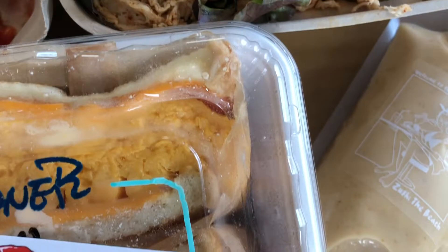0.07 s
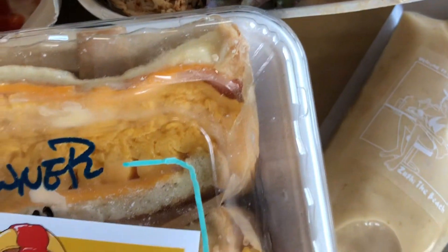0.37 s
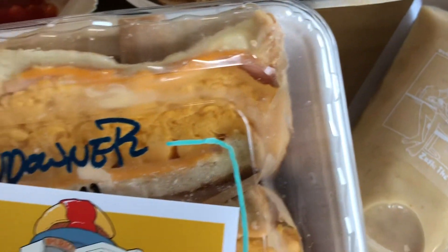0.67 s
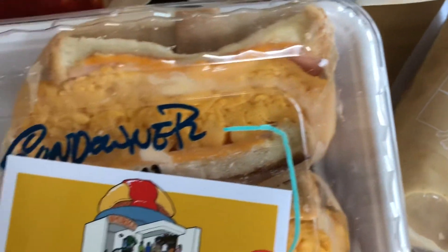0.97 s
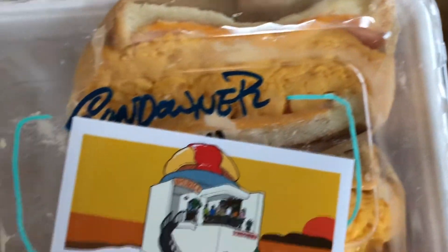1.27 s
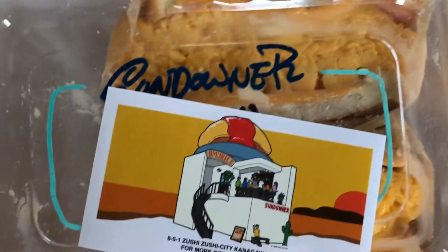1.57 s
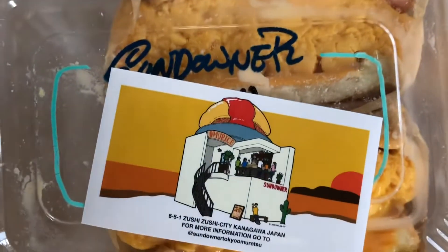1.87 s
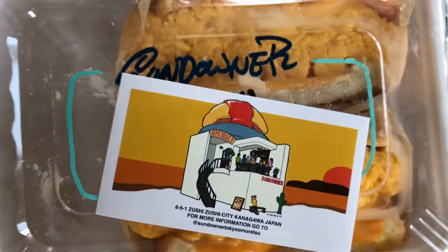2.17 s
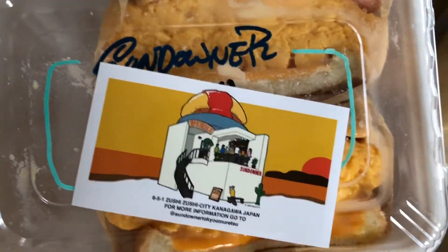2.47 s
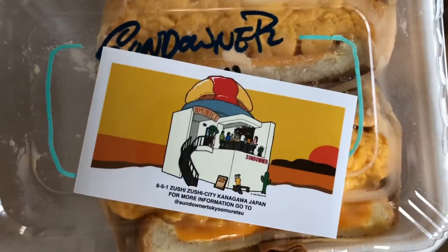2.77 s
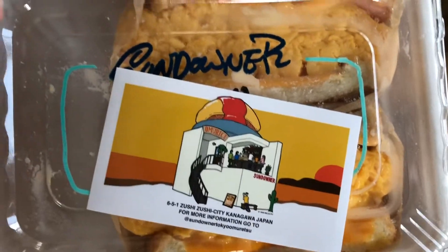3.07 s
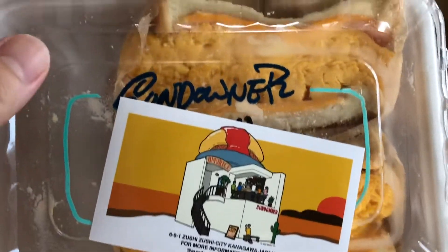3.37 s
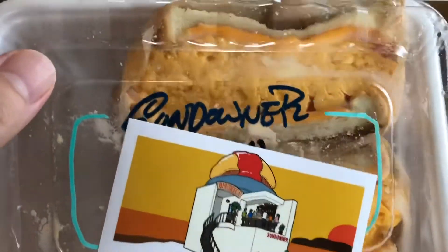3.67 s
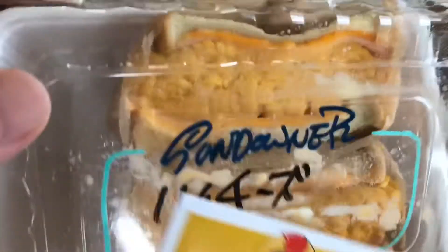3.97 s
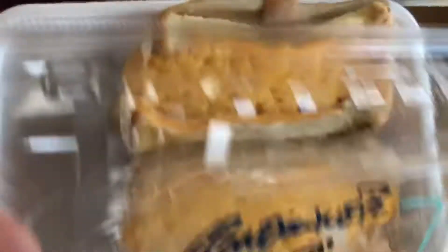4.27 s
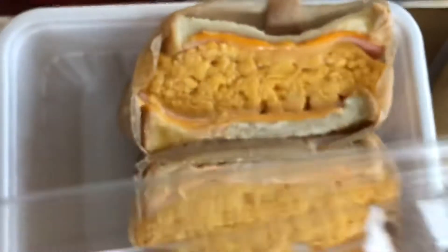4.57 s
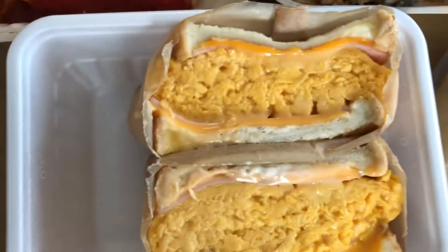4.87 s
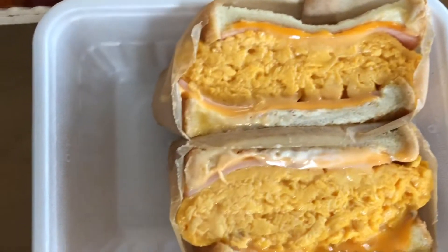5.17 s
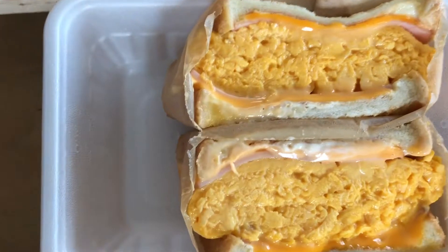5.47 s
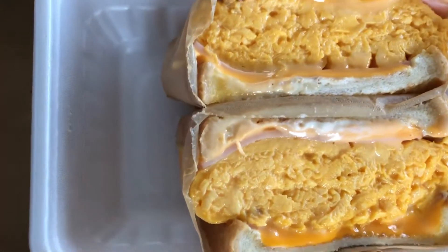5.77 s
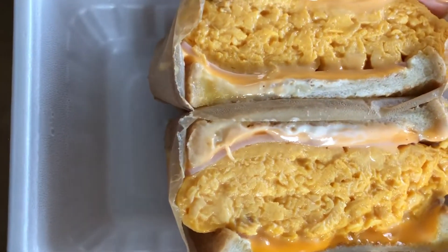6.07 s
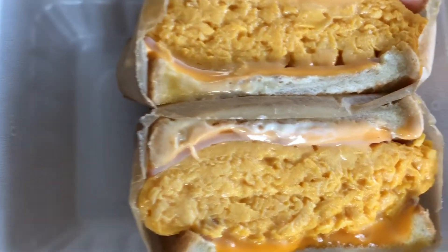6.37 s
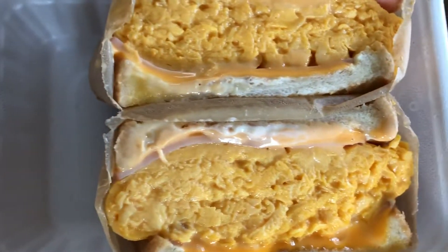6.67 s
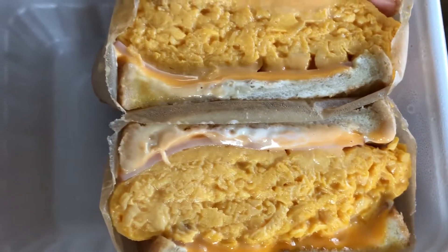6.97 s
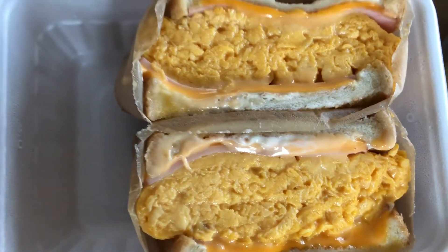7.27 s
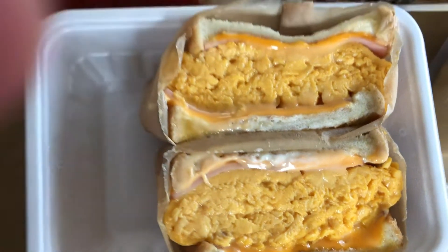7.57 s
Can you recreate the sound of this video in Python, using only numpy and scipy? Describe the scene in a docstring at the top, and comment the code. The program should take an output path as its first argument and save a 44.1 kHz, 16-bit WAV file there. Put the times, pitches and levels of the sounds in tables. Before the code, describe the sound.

Ventilation hums in a small, quiet room while hands brush faintly near the microphone. Fingers slide along the rim of a plastic takeaway tray, then the thin lid comes free with one loud pop and crackles, rustles and wobbles as it is lifted. Afterwards the tray gives a few scattered ticks, with a brief fingertip squeak and a soft knock.

```python
"""Ventilation drones in a small, quiet room, and hands brush softly close to the microphone.
Fingers slide along the rim of a takeaway tray, hissing as they stick and slip. Its thin plastic lid
buckles free with one loud pop, then crackles, rustles and wobbles as it bends and is lifted away.
Last, with a little more room around it, the tray ticks as it is turned and its walls give,
while fingertips squeak and knock on it."""
import sys
import numpy as np
from scipy import signal
from scipy.fft import rfft, irfft, next_fast_len
from scipy.io import wavfile
from scipy.ndimage import uniform_filter1d

SR = 44100
rng = np.random.default_rng(int(sys.argv[2]) if len(sys.argv) > 2 else 0)


def wav_record(signal):
    """Record a signal, one row per channel, as 16-bit PCM in the file named by sys.argv[1]."""
    frames = np.transpose(np.atleast_2d(signal))
    bounded = np.clip(frames, -1, 1)
    # unit amplitude maps onto the largest positive 16-bit level
    quanta = np.round(bounded * 32767).astype(np.int16)
    wavfile.write(sys.argv[1], SR, quanta)


N = 336483

# Room air. Each row: frequency in Hz, relative spectral level in dB.
AIR_COLOUR = [(15, -47), (25, -21.5), (45, -13), (70, -11), (98, -2.5), (135, -4.5), (175, -3.5),
              (215, -12), (265, -3.5), (350, -12), (520, -17.5), (1100, -21.5), (1800, -23), (2700, -25),
              (5200, -28.5), (7200, -28), (11000, -36.5), (15500, -38)]
# Duct resonances. Each row: frequency in Hz, width in Hz, level in dB.
DUCT_RESONANCES = [(263.76, 21, -73.5), (600, 100, -75.5), (1724, 250, -80), (3523, 120, -83)]
# The distant fan. Each row: pitch in Hz, level in dB, ratio of wavering to steady tone.
FAN_TONES = [(100.9, -71, 1.5), (170.43, -63, 0.38)]
# Background whistles. Each row: start, peak and end in seconds, pitch in Hz, level in dB.
WHISTLES = [(0.3, 0.5, 0.94, 3640, -81.5), (0.51, 0.539, 0.626, 1414, -64.5), (0.698, 0.95, 1.1, 3426, -76),
            (1.225, 1.265, 1.374, 1400, -69.5)]
# How long the room rings. Each row: frequency in Hz, t60 in seconds.
ROOM_DECAY = [(150, .5), (500, .34), (900, .36), (4000, .45), (8000, .24), (16000, .15)]
# Colours of the room's ring and the friction sounds. Each row: frequency in Hz, relative level in dB.
ROOM_COLOUR = [(100, 6), (300, 0), (600, -3), (1500, -3), (4000, -8.5), (6000, -6.5), (8000, -1.5),
               (12500, -6.5), (16000, -9)]
BRUSH_COLOUR = [(150, -25.5), (400, -1.5), (680, 2), (1000, -2.5), (1350, -6), (1800, -14), (3000, -35.5),
                (16000, -51)]
SLIDE_COLOUR = [(100, -19.5), (280, -0.5), (700, 1), (1900, 0.5), (2500, -4.5), (3400, -4.5), (3850, 3.5),
                (4200, -2), (4700, -0.5), (5400, -5.5), (9500, -8), (12000, -9.5), (16000, -11)]
RUSTLE_COLOUR = [(100, -25), (250, -10), (650, -4), (1100, -4.5), (1400, -7.5), (1800, -2), (2200, -7),
                 (4300, -9.5), (7000, -13.5), (11000, -16.5), (16000, -28.5)]

# Hands brushing and fingers squeaking. Each row: start, peak and end in seconds, level in dB.
BRUSHES = [(0.01, 0.099, 0.277, -61), (0.182, 0.258, 0.377, -63.5), (1.169, 1.305, 1.485, -63.5),
           (2.571, 2.676, 2.79, -63)]
SQUEAKS = [(6.421, 6.44, 6.453, -54), (6.471, 6.475, 6.488, -53), (6.494, 6.503, 6.512, -53)]
# Resonances of a squeak. Each row: frequency in Hz, width in Hz, relative level in dB.
SQUEAK_RESONANCES = [(1948, 70, -3.5), (3700, 142, 1), (4580, 630, -8), (5980, 220, -2)]
# Slides over plastic. Each row: start, peak and end in seconds, level in dB, tilt in dB per octave.
SLIDES = [(2.837, 2.858, 2.99, -45, 2), (2.92, 2.98, 3.03, -48, -1.07), (3.06, 3.075, 3.115, -58, -1.5),
          (3.2, 3.22, 3.27, -57, -2), (3.378, 3.427, 3.448, -43, -1.5), (3.553, 3.606, 3.635, -46.5, 1),
          (3.996, 4.013, 4.03, -40, -1.35), (4.035, 4.03, 4.11, -43, -3.5), (4.32, 4.35, 4.36, -48, -1.5),
          (4.466, 4.492, 4.525, -55, -2), (6.422, 6.437, 6.45, -57.5, 0), (5.88, 6.15, 6.33, -67.5, -1.5),
          (7.2, 7.45, 7.62, -63, -1.5)]
# Fingertip bumps. Each row: start in seconds, level in dB, pitch in Hz.
BUMPS = [(2.1303, -37, 197.6), (2.959, -48, 430), (3.468, -41, 250), (3.858, -35, 55), (4.372, -40.5, 235),
         (6.513, -29.5, 401)]

# Bands in which the plastic radiates, bass to top. Each row: lower and upper edge in Hz.
BANDS = [(155, 450), (450, 850), (850, 2000), (2000, 5500), (5500, 10500), (10500, 15500)]
# How well each shell radiates: one gain in dB for each band.
LID_VOICE_DB = [-0.5, -6.5, -0.65, 0, 0.13, -4]
TRAY_VOICE_DB = [-1.5, -7, -4, 2.5, -3.5, -5.5]
# The crowd of close, short-lived modes of a thin sheet. Each row: frequency in Hz, t60 in seconds.
SHEET_DECAY = [(200, 0.092), (600, 0.15), (1200, 0.09), (3500, 0.064), (8000, 0.018), (16000, 0.014)]
# Modes of the shells. Each row: frequency in Hz, relative level in dB, t60 in seconds.
LID_MODES = [(209.7, -11.5, 0.12), (230, -4, 0.07), (393, -10, 0.07), (520, -5, 0.05), (590, -9, 0.04),
             (662, -0.5, 0.045), (815, 0.5, 0.04), (914.1, 3.5, 0.041), (1106, 6, 0.026), (1200, 0, 0.04),
             (1310, -5.5, 0.04), (1460, -7, 0.06), (1670, 2, 0.045), (1778.6, 0, 0.075),
             (1931.6, -3, 0.05003), (2327, -2, 0.035), (2626, -5, 0.027), (2918.6, -1, 0.04),
             (3474, -8, 0.03), (3880, -7.5, .04), (4167, -3, 0.045), (4447, -9, .05), (4690, -7.5, 0.06),
             (4926, -4.5, 0.036), (6324, -7.5, 0.045), (7150, -5.5, .025), (8000, -5, 0.03067),
             (8900, -3, 0.019)]
TRAY_MODES = [(232, -5, 0.053), (285.8, -10.5, 0.103), (400, -6.5, 0.0574), (512.2, -3, 0.0457),
              (660, -2.5, 0.082), (791.4, 0.5, 0.0445), (907.4, -5.5, 0.07), (1295, -7, 0.0227),
              (1654, -2, 0.03), (1956.6, -3.5, 0.0484), (2294, -5, 0.022), (2810, -11.5, 0.035)]
TRAY_DAMPED_MODES = [(3600, 8, .005), (4150, 5, .005), (6100, 7, .004), (12550, 13, .003), (13800, 9, .002)]  # high modes that merge into broad humps
# A flat tray wall. Each row: multiple of its pitch, relative level in dB, t60 in seconds.
WALL_OVERTONES = [(1, -1, 0.17), (1.43, -9, .07), (2.07, -4, 0.08), (3.15, -7, .07)]
# Buckles of the tray. Each row: start in seconds, base level in dB, patch pitch in Hz, tilt above it in
# dB per octave, ring length as a factor, wall pitch in Hz, wall level in dB, top-band sparkle in dB.
TRAY_TICKS = [(4.7919, -49.5, 1800, -1, 0.89, 1153, -70, -5.5),
              (5.0906, -45.5, 250, 0.64, 1.11, 1121, -53.5, 0),
              (5.1079, -50, 329, -0.58, 0.87, 880, -61, 1),
              (5.444, -39.5, 297, -0.7963, 0.655, 840.5, -40.5, 8),
              (5.466, -41, 890, -5.5, 0.99, 850, -53.5, 11.5), (5.496, -50, 900, -7.5, 1.25, 852, -52.5, 0),
              (5.67, -33, 600, -2, 1.027, 976.7, -45.5, -4), (6.472, -47, 447, -2.5, 0.9, 598, -52, -1),
              (6.481, -64, 500, 1.5, 1.05, 619, -65.5, 2.5), (6.498, -61.5, 1700, 5, 1.94, 600, -61, 3),
              (6.512, -35.5, 400, -3.5, 1.29, 596.2, -37.5, 5), (6.526, -39, 600, -4, 1.45, 896, -54, 4),
              (6.538, -47, 600, -2.5, 1.1, 577, -55.5, 0), (7.419, -59.5, 1200, -1.5, 1.01, 853, -76.5, -5)]
# The lid is gripped, peeled and lifted. Each row: peak time, rise and fall time constants in seconds,
# rustle level in dB, wobble level in dB, wobble pitch in Hz.
LID_FLEXES = [(3.19, 0.2, 0.17, -57.5, -68.5, 200), (3.435, 0.0196, 0.017, -63.5, -48.5, 224),
              (3.6, 0.068, 0.0664, -46, -58, 199.2), (3.856, 0.0489, 0.03, -39, -39.5, 120),
              (3.965, 0.0175, 0.034, -39.5, -36, 187.9), (4.252, 0.037, 0.0662, -49.5, -47, 230),
              (4.367, 0.1, 0.0076, -44.5, -45, 232), (4.496, 0.0187, 0.039, -62, -62.5, 230)]
# Buckles of the lid. Each row: start in seconds, base level in dB, patch pitch in Hz,
# tilt above it in dB per octave, ring length as a factor.
LID_SNAPS = [(2.129, -62.5, 300, -0.5, 0.9), (3.123, -57.5, 400, -0.84, 0.76), (3.1909, -45, 650, -8, 0.6),
             (3.281, -45.5, 790, -15, 0.7), (3.344, -44, 985, -7.5, 0.55), (3.362, -46, 654, -7, 1.1),
             (3.429, -38.5, 520, -3.5, 0.6), (3.5327, -10, 660, -5.5, 0.656), (3.743, -45, 800, -2.5, 0.71),
             (3.757, -44, 1200, -2, 1.71), (3.8035, -41.5, 1710, -2, 1.7), (3.818, -38, 450, -3, 1.33),
             (3.829, -42.5, 1800, -5.5, 0.62), (3.8428, -34, 600, -1.5, 0.85),
             (3.85, -30, 400, -3.5, 0.744), (3.873, -37, 650, -3.5, 1.13), (3.898, -49, 900, -3.5, 0.71),
             (3.945, -38, 1000, -2.5, 0.7), (3.9466, -20, 1050, -4.5, 0.824),
             (3.958, -40.5, 900, -1.5, 0.68), (3.984, -35.5, 700, -3, 1.52),
             (4.022, -33.5, 1900, 1.5, 0.93), (4.044, -39, 740, -4.5, 0.364),
             (4.078, -39.5, 600, -4.5, 1.7), (4.0917, -46, 900, -4, 1.58),
             (4.2305, -46.5, 1200, -7.5, 0.616), (4.261, -52, 1200, -11.5, 0.72),
             (4.298, -32.5, 450, -5.5, 0.412), (4.3237, -39.5, 1190, -4, 0.8),
             (4.347, -44.5, 1200, -4, 0.84), (4.365, -37, 400, -4.5, 0.667)]


def gain_of(db):
    """Decibels to gain."""
    return 10 ** (np.asarray(db) / 20)


def unit_rms(x):
    """Scales to rms 1."""
    return x / np.sqrt(np.mean(x ** 2) + 1e-20)


def decay(t, t60):
    """An envelope that falls 60 dB in t60 seconds."""
    return np.exp(-np.log(1000) * t / t60)


def value_at(points, hz):
    """Reads a spectrum table on a log-frequency axis."""
    point_hz, value = np.transpose(points)
    return np.interp(np.log(hz + 1), np.log(point_hz + 1), value)


def add(mix, start, sound):
    """Mixes a sound in at a start time in seconds."""
    part = mix[round(start * SR):][:len(sound)]
    part += sound[:len(part)]


def coloured(x, colour, tilt_db=0):
    """Gives x a spectrum, tilted by some dB per octave; rms 1."""
    size = next_fast_len(len(x))
    hz = np.fft.rfftfreq(size, 1 / SR)
    gain = gain_of(value_at(colour, hz) + tilt_db * np.log2(hz + 1))
    return unit_rms(irfft(rfft(x, size) * gain, size)[:len(x)])


def resonate(x, hz, width_hz):
    """A resonance that can follow a moving frequency."""
    turn = np.exp(2j * np.pi * np.cumsum(hz * np.ones(len(x))) / SR)
    pole = np.exp(-np.pi * width_hz / SR)
    return 2 * (turn * signal.lfilter([1 - pole], [1, -pole], x / turn)).real


def narrow_noise(hz, width_hz, skirt_hz):
    """Noise through two resonances at one pitch; the wider one steepens the skirts."""
    return resonate(resonate(rng.standard_normal(N), hz, width_hz), hz, skirt_hz)


def dying_noise(seconds, t60_table, stretch=1):
    """Noise in which every frequency dies at its own speed."""
    noise = rng.choice([-1., 1.], int(seconds * SR))
    hz, t, spectrum = signal.stft(noise, SR, nperseg=128)
    t60 = stretch * value_at(t60_table, hz)[:, None]
    return signal.istft(spectrum * gain_of(-60 * t / t60), SR)[1]


def stroke(start, peak, end):
    """An envelope that rises straight to its peak and falls straight back."""
    return np.interp(np.arange(start, end, 1 / SR), [start, peak, end], [0, 1, 0])


def slips(samples, per_s, spread_db):
    """Stick and slip: a random train of tiny impulses, a few larger than the rest."""
    size = gain_of(spread_db * np.minimum(rng.exponential(1, samples), 4))
    return size * rng.choice([-1, 1], samples) * (rng.random(samples) < per_s / SR)


def bounced(x, strength, echoes=4):
    """Sound bounces between lid and tray walls within 5 ms, which ripples its spectrum."""
    taps = np.zeros(SR // 200)
    taps[0] = 1
    taps[rng.integers(SR // 1200, len(taps), echoes)] = strength * rng.choice([-1, 1], echoes)
    return np.convolve(x, taps)[:len(x)]


def ventilation(air_db=-59.5, swell_db=0.3):
    """Room tone: gently swelling air, a few duct resonances and the wavering tones of a distant fan."""
    swell = unit_rms(resonate(rng.standard_normal(N), hz=1.5, width_hz=1.7))
    out = gain_of(air_db + swell_db * swell) * coloured(rng.standard_normal(N), AIR_COLOUR)
    for hz, width_hz, db in DUCT_RESONANCES:
        out += gain_of(db) * unit_rms(narrow_noise(hz, width_hz, 2 * width_hz))
    for hz, db, waver_ratio in FAN_TONES:
        steady = unit_rms(np.sin(2 * np.pi * hz * np.arange(N) / SR))
        waver = unit_rms(narrow_noise(hz, width_hz=4.7, skirt_hz=40))
        out += gain_of(db) * unit_rms(steady + waver_ratio * waver)
    return out


def whistles():
    """Thin, slightly unsteady tones come and go faintly in the background."""
    out = np.zeros(N)
    for start, peak, end, hz, db in WHISTLES:
        envelope = stroke(start, peak, end)
        waver = unit_rms(uniform_filter1d(rng.standard_normal(len(envelope)), size=400))
        tone = np.sin(2 * np.pi * np.cumsum(hz * (1 + 0.004 * waver)) / SR)
        add(out, start, gain_of(db) * envelope * unit_rms(tone))
    return out


def room(x, delay_s=0.0036, build_s=0.00612):
    """The small room's diffuse ring; three tails crossfade, as its pattern shifts with the moving box."""
    out = np.zeros(N)
    for third in range(3):
        tail = coloured(dying_noise(0.6, ROOM_DECAY), ROOM_COLOUR)
        tail *= np.clip((np.arange(len(tail)) / SR - delay_s) / build_s, 0, 1)
        share = np.sqrt(2 / 3) * np.cos(np.pi * (1.7 * np.arange(N) / SR + third / 3))
        out += signal.oaconvolve(share * x, tail / np.linalg.norm(tail))[:N]
    return out


def brushes():
    """Skin and sleeve brush near the microphone as the hands shift: a soft, dull swish."""
    out = np.zeros(N)
    for start, peak, end, db in BRUSHES:
        pressure = stroke(start, peak, end) ** 0.636
        friction = slips(len(pressure), per_s=4000, spread_db=2)
        add(out, start, gain_of(db) * pressure * coloured(friction, BRUSH_COLOUR))
    return out


def squeaks(glide=0.021):
    """Skin sticks and slips on the tray; a few high resonances sing and rise with finger pressure."""
    out = np.zeros(N)
    for start, peak, end, db in SQUEAKS:
        pressure = stroke(start, peak, end) ** 0.39
        friction = slips(len(pressure), per_s=5300, spread_db=2)
        retune = 1 + glide * (pressure - 1)
        ring = sum(gain_of(part_db) * resonate(friction, hz * retune, width_hz)
                   for hz, width_hz, part_db in SQUEAK_RESONANCES)
        add(out, start, gain_of(db) * pressure * unit_rms(ring))
    return out


def slides():
    """Finger and rim slide over plastic: dense slips merge into a hiss that swells and fades."""
    out = np.zeros(N)
    for start, peak, end, db, tilt_db in SLIDES:
        pressure = stroke(start, peak, end) ** 0.92
        friction = bounced(slips(len(pressure), per_s=20000, spread_db=2.2), strength=0.22)
        add(out, start, gain_of(db) * pressure * coloured(friction, SLIDE_COLOUR, tilt_db))
    return out


def bumps(rise_s=0.002):
    """A soft fingertip wakes only the box's two lowest bending modes, and damps them at once."""
    out = np.zeros(N)
    t = np.arange(SR // 8) / SR
    envelope = (1 - np.exp(-t / rise_s)) * decay(t, t60=0.038)
    for start, db, hz in BUMPS:
        phase = 2 * np.pi * hz * t
        add(out, start, gain_of(db) * envelope * (np.sin(phase) + gain_of(-2.5) * np.sin(2 * phase)))
    return out


def patch_levels(db, hz, tilt_db, voice_db, bass_loss_db_per_octave=14.5):
    """Band levels of one buckle: a patch radiates poorly below its own pitch and tilts above it."""
    band_centres = np.sqrt(np.prod(BANDS, axis=1))
    octaves = np.log2(band_centres / hz)
    return db + np.array(voice_db) + octaves * np.where(octaves < 0, bass_loss_db_per_octave, tilt_db)


def buckle(band_db, ring_factor, modes, sheet_db, kick_db, kick_hz, rise_s):
    """A patch of plastic flips: one quick kick, then the shell's modes and the sheet's short hiss."""
    sheet = bounced(dying_noise(0.2, SHEET_DECAY, ring_factor), strength=0.25)
    t = np.arange(len(sheet)) / SR
    hz, db, t60 = np.transpose(modes)[:, :, None]
    tension, spot = rng.random((2, len(modes), 1))  # the bend retunes modes, the spot sets their phase
    hz = hz * (1 + 0.02 * (tension - 0.5))
    ringing = (gain_of(db) * decay(t, t60 * ring_factor) * np.sin(2 * np.pi * (hz * t + spot))).sum(0)
    cycles = t * kick_hz
    kick = cycles ** 2 * np.exp(2 - 2 * cycles) * np.sin(2 * np.pi * cycles)
    shell = ringing + gain_of(sheet_db) * sheet + gain_of(kick_db) * kick / ring_factor ** 2
    shell *= 1 - np.exp(-t / (rise_s * ring_factor ** 3))  # a larger patch rings longer and flips slower
    out = np.zeros(len(t))
    attack = t < 0.012
    for edges, level_db in zip(BANDS, band_db):
        band = signal.sosfilt(signal.butter(3, edges, "bandpass", fs=SR, output="sos"), shell)
        if edges == BANDS[0]:  # slow bending waves bring the bass late
            band *= 1 - np.exp(-t / 0.0038)
        out += gain_of(level_db) * band / np.sqrt(np.mean(band[attack] ** 2))
    return out


def wall_ring(hz, db, sharp_share=0.0505, settle_s=0.0145, rise_s=0.00076):
    """A dented wall of the tray rings hollow, starting sharp and settling to its pitch."""
    t = np.arange(SR // 4) / SR
    cycles = hz * (t + sharp_share * settle_s * (1 - np.exp(-t / settle_s)))
    ring = sum(gain_of(part_db) * decay(t, t60) * np.sin(2 * np.pi * multiple * cycles)
               for multiple, part_db, t60 in WALL_OVERTONES)
    return gain_of(db) * ring * (1 - np.exp(-t / rise_s))


def tray_ticks():
    """The loaded tray ticks as its walls give and ring on; a sharp crease adds sparkle on top."""
    out = np.zeros(N)
    for start, db, hz, tilt_db, ring_factor, wall_hz, wall_db, sparkle_db in TRAY_TICKS:
        band_db = patch_levels(db, hz, tilt_db, TRAY_VOICE_DB)
        band_db[-1] += sparkle_db
        add(out, start, buckle(band_db, ring_factor, TRAY_MODES + TRAY_DAMPED_MODES,
                               sheet_db=6.5, kick_db=6.5, kick_hz=2339.5, rise_s=0.00016))
        add(out, start, wall_ring(wall_hz, wall_db))
    return out


def flex_envelope(peak_s, rise_s, fall_s, db, stretch=1):
    """Each flex of the lid builds to its peak and relaxes, both exponentially."""
    power = np.zeros(N)
    for peak, rise, fall, gain in zip(peak_s, rise_s, fall_s, gain_of(db)):
        t = (np.arange(N) / SR - peak) / stretch
        exponent = np.minimum(t / rise, -t / fall)
        power += (gain * np.exp(np.maximum(exponent, -30))) ** 2
    return np.sqrt(power)


def lid_wobble():
    """The whole lid wobbles in brief swells; its low resonance glides from one flex to the next."""
    peak_s, rise_s, fall_s, _, db, hz = np.transpose(LID_FLEXES)
    gliding_hz = np.interp(np.arange(N) / SR, peak_s, hz)
    wobble = narrow_noise(gliding_hz, width_hz=140, skirt_hz=240)
    radiated = signal.sosfilt(signal.butter(3, 36, "highpass", fs=SR, output="sos"), wobble)
    return flex_envelope(peak_s, rise_s, fall_s, db, stretch=0.71) * unit_rms(radiated)


def lid_rustle(strain_shift=0.025):
    """Fine, even slips at three spots feed the lid's hollow modes, which rise as it is strained."""
    grains = np.zeros(N)
    for _ in range(3):
        patch = unit_rms(dying_noise(0.05, SHEET_DECAY, stretch=0.28))
        grains += signal.oaconvolve(slips(N, per_s=500, spread_db=2), patch)[:N]
    peak_s, rise_s, fall_s, db, _, _ = np.transpose(LID_FLEXES)
    flex = flex_envelope(peak_s, rise_s, fall_s, db)
    retune = 1 + strain_shift * (np.sqrt(flex / flex.max()) - 0.5)
    hollow = sum(gain_of(mode_db) * t60 * resonate(grains, hz * retune, width_hz=8.6 / t60)
                 for hz, mode_db, t60 in LID_MODES)
    return flex * coloured(unit_rms(grains) + gain_of(-4.5) * unit_rms(hollow), RUSTLE_COLOUR)


def lid_snaps():
    """Right at the microphone, the lid pops off the rim and crackles as patch after patch buckles."""
    out = np.zeros(N)
    for start, db, hz, tilt_db, ring_factor in LID_SNAPS:
        band_db = patch_levels(db, hz, tilt_db, LID_VOICE_DB)
        add(out, start, buckle(band_db, ring_factor, LID_MODES,
                               sheet_db=7, kick_db=4.5, kick_hz=1440, rise_s=0.00015))
    return out


def scene():
    """One close microphone faces the lid; the tray underneath has more room; the squeaks stay dry."""
    near = lid_snaps() + slides() + lid_rustle() + lid_wobble() + bumps() + brushes()
    underneath = tray_ticks()
    direct = near + underneath + squeaks()
    reverb = room(gain_of(-18) * near + gain_of(-13) * underneath)
    return (direct + reverb + whistles() + ventilation())[None]


def record(dry):
    """The recorder cuts off steeply at about 16 kHz."""
    lowpass = signal.firwin(767, 16080, window=("kaiser", 9), fs=SR)
    return signal.oaconvolve(dry, lowpass[None], "same")


dry = scene()
out = record(dry)
wav_record(out)
```